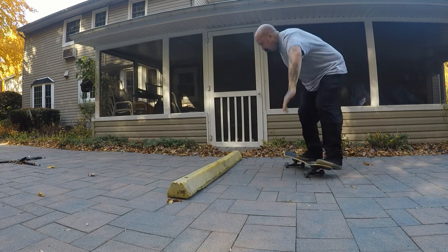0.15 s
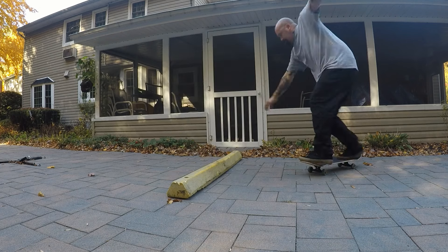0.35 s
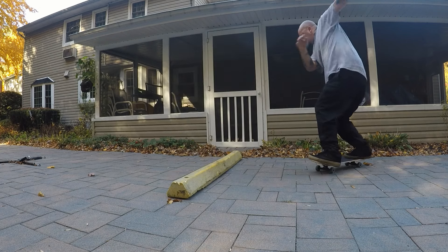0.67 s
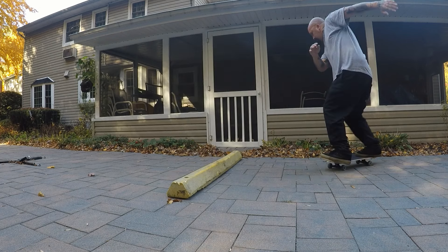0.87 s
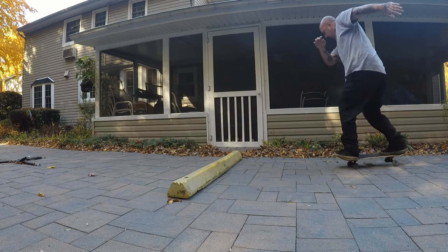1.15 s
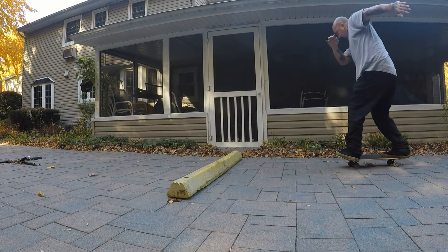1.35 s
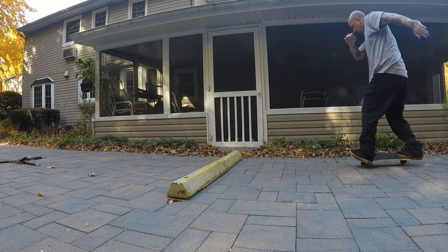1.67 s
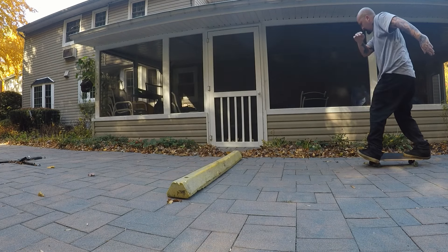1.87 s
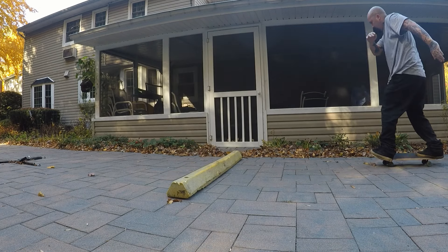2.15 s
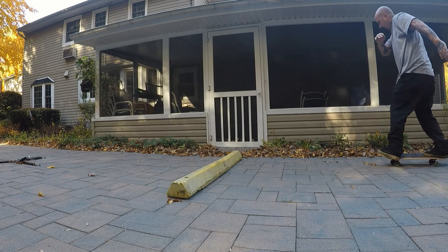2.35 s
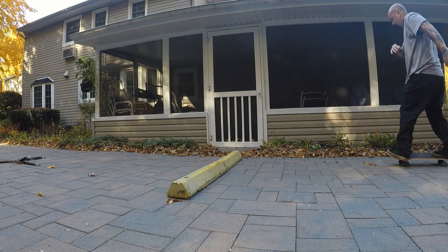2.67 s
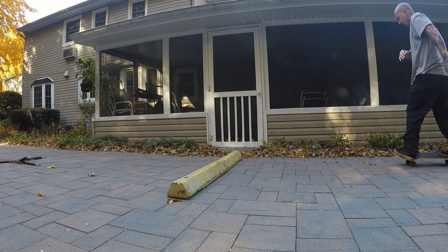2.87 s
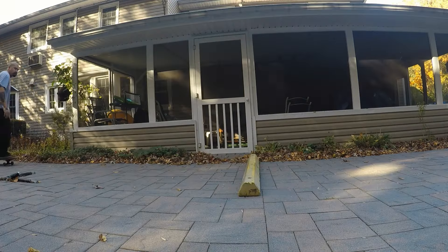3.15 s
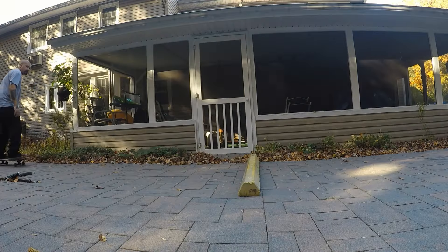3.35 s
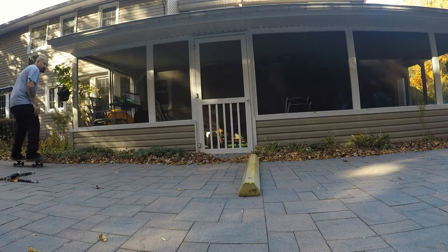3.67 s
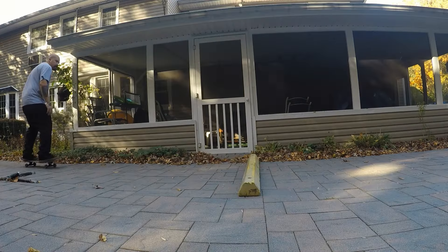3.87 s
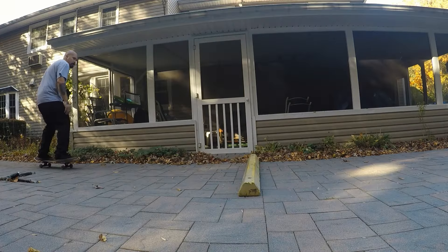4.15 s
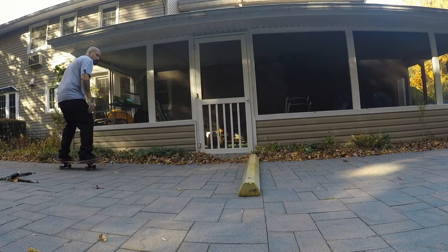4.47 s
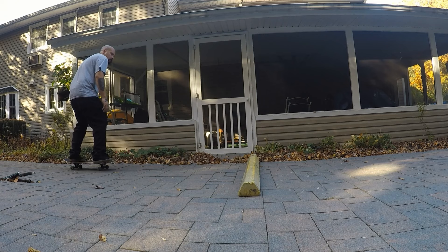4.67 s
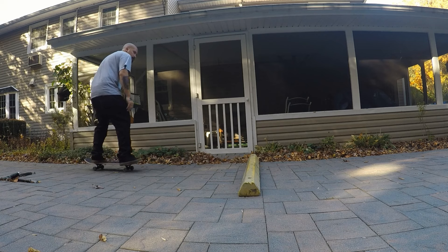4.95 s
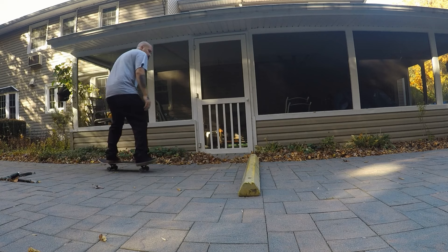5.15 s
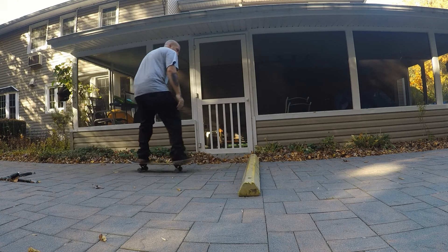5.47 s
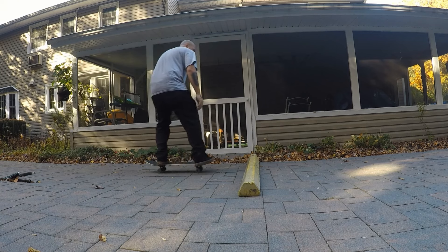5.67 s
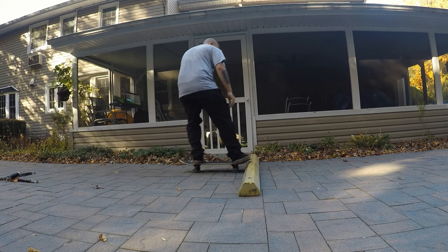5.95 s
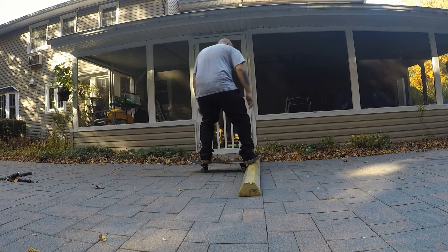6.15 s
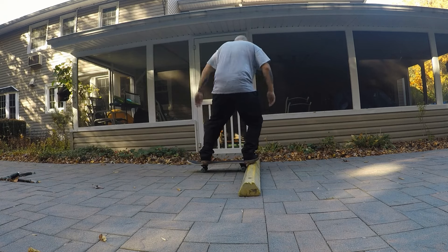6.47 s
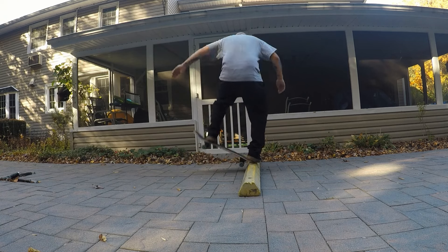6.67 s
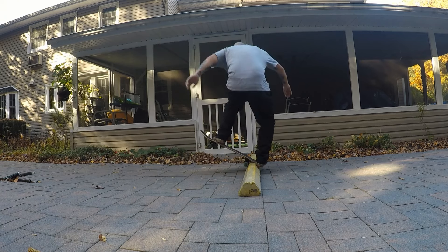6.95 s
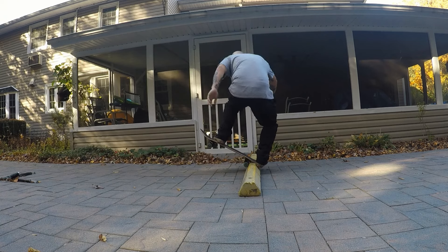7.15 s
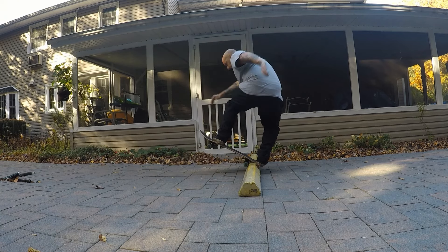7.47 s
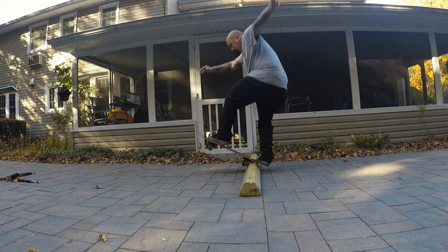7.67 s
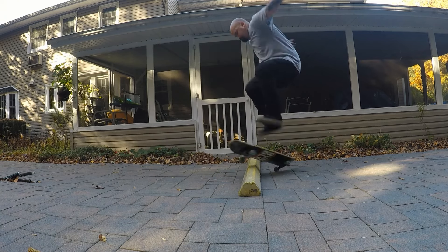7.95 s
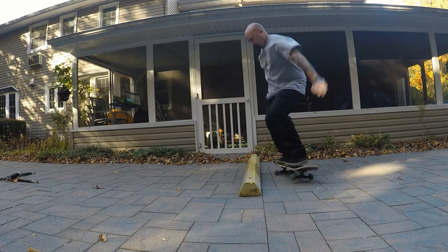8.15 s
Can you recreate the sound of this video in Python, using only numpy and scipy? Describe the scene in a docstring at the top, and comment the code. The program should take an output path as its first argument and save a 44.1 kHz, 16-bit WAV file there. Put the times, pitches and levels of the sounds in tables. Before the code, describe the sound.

A skateboard lands with woody thuds and cracks on patio pavers, then rolls off right, its rumble fading among sparse joint knocks, scuffs and tiny squeaks. A dry click opens a second, louder roll from the left, with dense bassy bumps over a distant motor hum. The board knocks onto a hollow-sounding parking block, pauses, pops with a metallic crack and lands hard. Close low stereo microphone, short house echo.

```python
"""Skateboard on a brick patio

Close on the pavers, from a camera with two microphone ports, beside a house that returns a short echo.
The rider lands and rolls off right, rolls in from the left, stalls on a parking block and pops off it.
Tail pops, landings and joints are swelling sine thuds through the ground; cracks, wheel scrub and
squeaks are filtered noise, ringing modes and wandering tones through the air.
A click opens the second ride; a distant motor hums through it, over outdoor rumble, wash and hiss."""
import sys
import numpy as np
from scipy import signal
from scipy.fft import rfft, irfft, next_fast_len
from scipy.io import wavfile
from scipy.ndimage import uniform_filter1d, minimum_filter1d, map_coordinates

SR = 44100
rng = np.random.default_rng(int(sys.argv[2]) if len(sys.argv) > 2 else 0)


def write(x):
    x = np.atleast_2d(x).T
    wavfile.write(sys.argv[1], SR, np.round(np.clip(x, -1, 1) * 32767).astype(np.int16))

N = 366030
T = np.arange(N) / SR

# Levels in the tables are relative; some sources trim them further.
# deck and trucks strike paving or block: start_s, crack_db, thud_db, thud_hz, thud_swell_s,
# truck_ring_db, rattle_db
BLOWS = [(0.012, -20, -12, 272, 0.0066, -49.5, -43), (0.057, -27, -22, 190, 0.014, -49, -49),
         (0.1163, -21, -5, 237, 0.0054, -39, -46.5), (0.4343, -20.5, -4, 273, 0.007, -26, -34.5),
         (0.439, -19.5, -9.5, 249, 0.011, -23.5, -40), (1.2888, -14.5, -5, 238, 0.0078, -34, -40),
         (6.111, -25.5, -6.5, 141, 0.0024, -35, -41.5), (6.145, -24, -5, 218, 0.0039, -52, -48),
         (6.8641, -16, -5, 278, 0.0026, -45, -32), (6.943, -46, -5.5, 189.6, 0.005, -48, -53),
         (7.843, -23, -6.5, 168, 0.0043, -25, -38.5), (7.8504, -26.5, -8, 308.4, 0.014, -24, -52),
         (7.9095, -23, -5, 179.5, 0.007, -50, -30), (7.93, -13.5, 4.5, 281, 0.0089, -5.5, -36),
         (8.0272, -14.5, 1, 278, 0.0075, -30, -40), (8.135, -22, -5.5, 253, 0.0073, -40, -37),
         (8.153, -19.5, 6.5, 286, 0.0078, -42, -35)]
# modes of the trucks and deck, each retuned a little per blow: pitch_hz, level_db, decay_s
TRUCK_MODES = [(1430, -15, .004), (1885, -11, .004), (2850, -3, .0015), (3170, 2, .0014), (3660, 8, .0017),
               (4200, -4, .0015)]
# the maple deck and its bolted hardware, around these values: pitch_hz, level_db, decay_s
WOOD_MODES = [(301.6, -0.5, 0.04), (343, 2.5, 0.01), (456.5, -5.5, 0.014), (522.6, -7, 0.012),
              (611, -13.5, 0.012), (747, -19.5, 0.011), (1235, -21.5, 0.017), (1444, -22, 0.0067),
              (1765, -25, .011), (1830, -23.5, 0.013), (2230, -25.5, 0.013)]
# the deck shuddering after a blow: frequency_hz, density_db (dB per Hz)
DECK_SPECTRUM = [(30, -49.5), (80, -5.5), (140, 4), (220, 1.5), (300, 2.5), (380, -9), (470, -15.5),
                 (650, -32), (950, -39), (2000, -48.5), (4000, -100)]
# cracks in the air: frequency_hz, density_db (dB per Hz)
CRACK_SPECTRUM = [(300, -0.5), (600, 1), (950, -11), (1400, 2.5), (1900, -9), (2500, -8), (3600, -10),
                  (4800, -13), (6200, -7), (9000, -18.5), (15000, -30.5)]
# wheels slap down or drop into the deeper paver joints; the first row is a blow's dying thud:
# start_s, thud_db, thud_hz, knock_db
JOINTS = [(0.001, -13, 292, -32), (0.161, -19.5, 307, -40), (0.381, -7, 263, -32), (0.391, -14.5, 308, -35),
          (0.889, -9, 241, -43), (1.107, -7.5, 260, -29.5), (1.284, -7, 248, -20), (1.363, -12, 237, -44.5),
          (1.676, -13.5, 269, -35), (1.773, -9, 194, -42.5), (2.013, -7, 147.5, -49), (2.064, -7, 168, -34),
          (2.287, -21, 243, -39.5), (2.665, -11, 210, -45), (3.129, -13, 186, -34), (3.177, -6, 170, -32.5),
          (3.204, -10.5, 251, -32), (3.298, -7, 191, -28.5), (3.326, -8, 193, -29.5),
          (3.365, -5.5, 182, -24), (3.425, -7, 220, -35), (3.531, -5.5, 138, -32), (3.553, -6, 171, -28),
          (3.616, -3.5, 176, -24.5), (3.706, -6.5, 161, -35), (3.73, -5, 260, -33), (3.766, -6.5, 188, -45),
          (3.818, -5.5, 305, -37), (3.883, -11, 375, -31.5), (3.989, -4.5, 265, -26.5),
          (4.06, -4, 184, -32), (4.153, -6.5, 177, -30.5), (4.178, -6, 254, -32), (4.314, -14, 206, -36),
          (4.348, -11, 300, -27), (4.382, -5.5, 255, -33), (4.473, -8.5, 239, -32.5), (4.533, -4, 204, -32),
          (4.561, -6.5, 279, -28.5), (4.681, -10.5, 195, -35.5), (4.768, -8.5, 202, -33.5),
          (4.864, -15, 230, -28.5), (4.888, -3, 290, -26.5), (4.947, -3.5, 173.5, -24.5),
          (4.997, -9.5, 201, -30.5), (5.067, -4.5, 181, -34), (5.178, -17.5, 200, -32),
          (5.258, -5, 223, -26), (5.277, -5, 321, -22), (5.432, -13.5, 308, -28), (5.455, -5.5, 256, -30),
          (5.52, -13.5, 210, -31.5), (5.626, -1.5, 172, -22.5), (5.736, 0, 187, -24.5),
          (5.808, -7, 239, -36), (5.92, -4.5, 210, -28), (5.972, -2.5, 148, -27), (5.998, -8, 211, -26),
          (6.048, -6.5, 158, -24.5), (6.18, -12, 256, -30.5), (6.9, -4, 262, -27), (8.279, -7, 218, -35)]
# a wheel clacking on a paver edge: frequency_hz, density_db (dB per Hz)
CLACK_SPECTRUM = [(300, -4), (520, 4), (720, -9.5), (930, -9.5), (1500, -20), (7000, -33.5)]
# stretches on the wheels; a negative fade grows: start_s, stop_s, rumble_db, hiss_db, fade_db_per_s
ROLLS = [(0.44, 0.807, -31, -56, 9.5), (0.857, 3.14, -24.5, -55, 1.5), (3.118, 6.173, -16.5, -59.5, -1.2),
         (8.16, 8.302, -32, -64, 3)]
# paving shaken by the wheels: frequency_hz, density_db (dB per Hz)
GROUND_SPECTRUM = [(24, -26.5), (40, -29), (98, -2.5), (130, -3), (166, -5), (310, -8.5), (377, -12.5),
                   (433, -22.5), (527, -25.5), (770, -46.5), (1500, -54), (3300, -120)]
# wheels and trucks scuff sideways: middle_s, nominal length_s, level_db
SCUFFS = [(0.106, 0.1, -52), (0.338, 0.055, -51), (0.617, 0.058, -53), (0.729, 0.091, -48.5),
          (1.07, 0.17, -54.5), (1.284, 0.024, -44), (1.407, 0.1, -43), (1.589, 0.092, -46),
          (1.729, 0.13, -40.5), (2.37, 0.11, -50), (2.964, 0.041, -49.5), (3.573, 0.05, -51),
          (3.974, 0.1, -52.5), (4.193, 0.12, -51.5), (4.598, 0.17, -54.5), (4.987, 0.26, -57.5),
          (5.517, 0.16, -45.5), (5.797, 0.13, -43), (5.963, 0.11, -52), (6.079, 0.055, -46),
          (7.783, 0.22, -50), (8.284, 0.022, -44.5)]
# the rough notes a scuff sings, before they wander: pitch_hz, level_db against the scuff
SCUFF_NOTES = [(3000, -12), (3720, -4), (4550, -11)]
# wheels scrubbing on gritty brick: frequency_hz, density_db (dB per Hz)
GRIT_SPECTRUM = [(500, -33), (1000, -21.5), (1450, -9.5), (1820, -10), (2100, -13.5), (2750, -9.5),
                 (3060, -7.5), (3380, -6.5), (3700, -1.5), (4080, -5.5), (5200, -8), (6700, -5.5),
                 (8200, -12), (13000, -24.5), (15500, -40)]
# wheels squeak as the board pivots, around this pitch: start_s, length_s, pitch_hz, level_db
SQUEAKS = [(.085, .035, 3200, -40), (.09, .028, 4400, -40), (.315, .045, 3450, -43), (.592, .04, 3250, -44),
           (1.725, .028, 3100, -36), (6.398, .045, 3950, -43), (6.582, .02, 4000, -50)]
# the board judders on brick or block, or its deck rings roughly in the air after the pop:
# middle_s, length_s, level_db
JUDDERS = [(5.785, 0.13, -29), (6.12, 0.09, -26), (6.888, 0.04, -28), (6.96, 0.06, -24),
           (7.02, 0.13, -34.5), (7.82, 0.11, -26.5), (7.99, 0.08, -28.5), (8.067, 0.04, -28)]
# rough concrete shaking the deck: frequency_hz, density_db (dB per Hz)
CONCRETE_SPECTRUM = [(100, -12), (310, 10), (480, 4), (750, -24), (1800, -45), (7000, -68)]
# the board comes down on the parking block: start_s, ring_db, weight_db
BLOCK_HITS = [(6.112, -15, -22), (6.146, -24, -10.5), (6.863, -16.5, -8)]
# the clack of the block: pitch_hz, level_db against its hollow note, decay_s
BLOCK_MODES = [(1350, -26, .012), (1740, -20, .013), (2100, -24.5, .01)]
# the distant motor, before its speed wanders: time_s, pitch_hz, level_db
MOTOR = [(3.147, 138.3, -22.5), (4.099, 135.5, -22.5), (5, 134.6, -19.5), (6, 136.5, -22),
         (6.6, 139.5, -27.5), (7.4, 139.2, -22.5), (8.3, 136.7, -30.5)]
# the motor's tones: pitch_ratio (to the motor pitch), level_db
MOTOR_TONES = [(.468, -11), (1, 0.5), (1.794, -18.5), (2, -22)]
# the deep outdoor rumble: time_s, level_db
DEEP_RUMBLE = [(0, -40), (1.5, -28.5), (3, -44.5), (3.15, -27.5), (7.8, -25), (8.3, -24.5)]
# the far wash of the yard: frequency_hz, density_db (dB per Hz)
YARD_SPECTRUM = [(100, -13.5), (250, 15.5), (600, 2), (1000, -6), (2000, -7.5), (4500, -15.5),
                 (9500, -14.5), (14000, -25)]
# where the board is: time_s, bearing (-1 left to 1 right)
BEARING = [(0, 0.31), (1.3, 0.62), (3.1, 0.71), (3.15, -0.64), (4.5, -0.6), (5.5, -0.61), (6.2, 0.65),
           (7.8, 0.37), (8.3, 0.81)]
# how ground vibration drives the two ports against each other: frequency_hz, side_minus_mid_db
PORT_ROCKING = [(60, -13.5), (130, -20.5), (300, -20), (430, -13.5), (650, 4.5), (900, 18.5), (1500, 13.5)]

CRACK_LENGTH_S = 0.003  # fall time of every crack's bell-shaped burst
STRIKE_SPREAD_DB = 3  # spread of the wood modes from strike to strike
BUMPS_DB, SHUDDER_DB, DRAG_RING_DB = -5.5, -14.5, -10  # brick faces, after a joint, wood in a judder
# shallow joints: rate, thud level over the rumble and its spread
SHALLOW_PER_S, SHALLOW_DB, SHALLOW_SCATTER_DB = 6, -4, 1.5
SHALLOW_HZ, SHALLOW_KNOCK_DB = 229, -29.5  # usual pitch; knock level against the thud
ROLL_ATTACK_S, ROLL_RELEASE_S = 0.03, 0.084
HISS_PATCH_DB, HISS_PATCHES_PER_S = 1.8, 22  # gritty and smooth bricks under the wheels
CATCH_DB, CATCHES_PER_S = 2.5, 90  # a sliding wheel grips and lets go
# each scuff note wanders in pitch (fraction) and swells on its own
SING_WANDER, SING_SWELL_DB, SING_SWELLS_PER_S = .035, 4, 18
CLICK_S, CLICK_DB, CLICK_DECAY_S = 3.1433, -9.5, 0.0032
AIR_HISS_DB = -67
TOP_HZ = 15400


def undb(db):
    """Decibels to gain."""
    return 10 ** (np.asarray(db) / 20)


def curve(rows):
    """Join (time_s, value) rows by straight lines."""
    return np.interp(T, *np.transpose(rows))


def unit(x):
    """Scale to rms 1."""
    return x / np.sqrt(np.mean(x ** 2))


def noise():
    """White noise, rms near 1."""
    return rng.standard_normal(N)


def walk(rate):
    """Smooth chance, spread near 1, with about `rate` turns a second."""
    hold = max(int(SR / rate), 1)
    steps = np.repeat(rng.standard_normal(N // hold + 1), hold)
    return 1.272 * uniform_filter1d(steps, hold)[:N]


def gains(points, hz):
    """Read a (frequency_hz, level_db) spectrum on a log-frequency axis."""
    f, db = np.transpose(points)
    return undb(np.interp(np.log(hz + 1), np.log(f), db))


def colour(x, points, size=4096):
    """Causal, minimum-phase filter of unit energy with the given spectrum."""
    cepstrum = irfft(np.log(gains(points, np.fft.rfftfreq(size, 1 / SR))))
    cepstrum[1:size // 2] *= 2  # fold the cepstrum onto positive time
    cepstrum[size // 2 + 1:] = 0
    response = irfft(np.exp(rfft(cepstrum)))
    return signal.oaconvolve(x, response / np.linalg.norm(response))[:N]


def add(track, s, sound):
    """Mix a sound into a track at time s."""
    i = max(int(s * SR), 0)
    track[i:i + len(sound)] += sound[:N - i]


def grains(rate, spread_db):
    """Random tiny impacts, a few much larger than the rest, together rms 1."""
    hits = rng.random(N) < rate / SR
    sizes = undb(spread_db * np.minimum(rng.exponential(size=N), 3))
    return unit(hits * noise() * sizes)


def thud(hz, swell_s, size=5000):
    """The loaded board bounces on its wheels: a few cycles that swell and die."""
    t = T[:size]
    swell = (t / swell_s * np.exp(1 - t / swell_s)) ** 2
    return -swell * np.sin(2 * np.pi * hz * t)


def mode(hz, decay_s, size=8000):
    """A struck resonance: a sine that decays exponentially."""
    return np.exp(-T[:size] / decay_s) * np.sin(2 * np.pi * hz * T[:size])


def ringing(kicks, decay_s, size=20000):
    """Envelope of the vibration that lingers after each kick, summed as energy."""
    energy = signal.oaconvolve(kicks ** 2, np.exp(-2 * T[:size] / decay_s))[:N]
    return np.sqrt(np.abs(energy))


def wood(size=5000):
    """The deck's ring; where it is struck decides which modes speak, so each strike is drawn anew."""
    ring = np.zeros(size)
    for hz, db, decay_s in WOOD_MODES:
        level = undb(db + STRIKE_SPREAD_DB * rng.normal())
        ring += level * mode(hz * (1 + 0.018 * rng.normal()), decay_s, size=size)
    return ring


def through_deck(x):
    """Small knocks ring the deck's modes."""
    ring = wood()
    return signal.oaconvolve(x, ring / np.linalg.norm(ring))[:N]


def blows(thud_db=0.5, crack_db=-3.0, ring_db=0, knock_db=-11, knock_hz=470, knock_s=0.0034,
          shake_db=-12.5, shake_s=0.062, rattle_s=0.04, rebound_db=5, rebounds_per_s=260,
          bite_s=0.0012, size=5000):
    """Blows thud, crack and ring trucks and deck; loose hardware rattles and rebounds: (ground, air)."""
    ground, clatter, metal, body, heavy, loose = np.zeros((6, N))
    bite = 1 - np.exp(-T[:size] / bite_s)  # contact builds up as grit crushes
    burst = bite * np.exp(-(T[:size] / CRACK_LENGTH_S) ** 2)
    for s, crack, weight, hz, swell_s, ring, rattle in BLOWS:
        knock = undb(knock_db) * thud(knock_hz, knock_s)
        add(ground, s, undb(weight + thud_db) * (thud(hz, swell_s) + knock))
        add(clatter, s, undb(crack + crack_db) * burst)
        tones = sum(undb(db) * mode(f * (1 + 0.023 * rng.normal()), decay_s, size=size)
                    for f, db, decay_s in TRUCK_MODES)
        add(metal, s, undb(ring + ring_db) * bite * tones)
        add(body, s, undb(crack) * bite * wood(size=size))
        add(heavy, s, undb([weight]))
        add(loose, s, undb([rattle]))
    ground += undb(shake_db) * colour(noise() * ringing(heavy, shake_s), DECK_SPECTRUM)
    rattling = ringing(loose, rattle_s)
    rebounds = rattling * grains(rebounds_per_s, 0.87)
    body += undb(rebound_db) * through_deck(rebounds)
    fine_cracks = (clatter + 0.95 * rattling) * grains(22000, .5)
    return ground, metal + body + colour(fine_cracks + 0.5 * rebounds, CRACK_SPECTRUM)


def joints(thud_db=0.8, swell_s=0.0037, knock_db=5, knock_hz=480, knock_s=0.0032, flex_hz=94,
           flex_db=-25, far_db=21, flex_s=0.032, shake_s=0.068, clack_db=-10.5, clack_s=0.015):
    """Each row gives a knock, bounce, deck flex, short shudder and hollow clack: (ground, air)."""
    ground, kicks, edges = np.zeros((3, N))
    rows = np.vstack([JOINTS, shallow_joints()])
    detune = np.exp(0.072 * rng.standard_normal((len(rows), 2)))
    for (s, db, hz, knock), (knock_tune, flex_tune) in zip(rows, detune):
        far = abs(np.interp(s, *np.transpose(BEARING)))  # further off, the bass takes a larger share
        add(ground, s, undb(db + thud_db) * thud(hz, swell_s))
        add(ground, s, undb(knock + knock_db) * thud(knock_hz * knock_tune, knock_s))
        add(ground, s, undb(db + flex_db + far_db * far) * thud(flex_hz * flex_tune, flex_s))
        add(kicks, s, undb([db]))
        add(edges, s, undb([knock]))
    shudder = undb(SHUDDER_DB) * noise() * ringing(kicks, shake_s)
    clacks = undb(clack_db) * grains(2500, 0.92) * ringing(edges, clack_s)
    return ground + colour(shudder, GROUND_SPECTRUM), colour(clacks, CLACK_SPECTRUM)


def shallow_joints(count=90):
    """Lesser joints pass at random, as strong as the rolling rumble. Returns rows like JOINTS."""
    rumble, _ = riding()
    place, strength, pitch = rng.standard_normal((count, 3)).T
    s = (np.arange(count) + place / 2) / SHALLOW_PER_S
    rumble_db = 20 * np.log10(np.interp(s, T, rumble) + 1e-9)
    db = rumble_db + SHALLOW_DB + SHALLOW_SCATTER_DB * strength
    rows = np.column_stack([s, db, SHALLOW_HZ * np.exp(0.22 * pitch), db + SHALLOW_KNOCK_DB])
    return rows[(s > 0) & (s < T[-1])]


def riding():
    """Each stretch starts quickly, fades or grows steadily and dies away: gains (rumble, hiss)."""
    rumble, hiss = np.zeros((2, N))
    for start, stop, rumble_db, hiss_db, fade in ROLLS:
        attack = np.clip((T - start) / ROLL_ATTACK_S, 0, 1)
        release = np.exp(-np.maximum(T - stop, 0) / ROLL_RELEASE_S)
        level = attack * release * undb(-fade * np.maximum(T - start, 0))
        rumble += undb(rumble_db) * level
        hiss += undb(hiss_db) * level
    return rumble, hiss


def rolling(patchy_db=3.0, patches_per_s=12, soft_hz=340):
    """Bumps of the brick faces, some rougher than others, shake the paving through the soft wheels."""
    rumble, _ = riding()
    bumps = grains(400, 1.1) * rumble * undb(BUMPS_DB + patchy_db * walk(patches_per_s))
    soft_wheels = signal.butter(N=2, Wn=soft_hz, fs=SR, output="sos")
    return signal.sosfilt(soft_wheels, colour(bumps, GROUND_SPECTRUM))


def scrub(db=-0.4, tread_db=0, chatter_db=2.0, sand_db=-8):
    """Wheels hiss and crush sand; pushed sideways they catch and slip, singing at a wandering pitch."""
    slide = np.zeros(N)
    for s, length, scuff_db in SCUFFS:
        window = signal.windows.tukey(int(length * SR * 3 / 2), .8)  # its soft ends reach past the length
        add(slide, s - length * 3 / 4, undb(scuff_db + db) * window)
    slide *= undb(CATCH_DB * walk(CATCHES_PER_S))
    slips = grains(16000, .6) * undb(chatter_db * walk(220))
    _, hiss = riding()
    tread = hiss * undb(tread_db + HISS_PATCH_DB * walk(HISS_PATCHES_PER_S))
    rub = np.hypot(slide, tread)
    sand = grains(160, 2.2) * rub * undb(sand_db)
    sing = np.zeros(N)
    for hz, note_db in SCUFF_NOTES:
        turns = np.cumsum(hz * (1 + SING_WANDER * walk(CATCHES_PER_S))) / SR
        swell = undb(note_db + SING_SWELL_DB * walk(SING_SWELLS_PER_S))
        sing += swell * slide * walk(220) * np.sin(2 * np.pi * turns)  # the fast walk roughens the note
    return colour(slips * rub + sand, GRIT_SPECTRUM) + sing + colour(noise() * tread / 2, CRACK_SPECTRUM)


def squeaks(arch=0.056, octave_db=-7):
    """Stick-slip locks briefly into a rough pitch that rises and falls."""
    out = np.zeros(N)
    waver = .065 * walk(1800)
    for s, length, hz, db in SQUEAKS:
        grip = np.sin(np.linspace(0, np.pi, int(length * SR)))
        pitch = hz * (1 + arch * (grip - 2 / np.pi) + waver[int(s * SR):][:len(grip)])
        phase = 2 * np.pi * np.cumsum(pitch) / SR
        add(out, s, undb(db) * grip * (np.sin(phase) + undb(octave_db) * np.sin(2 * phase)))
    return out


def judder(scrape_db=-24):
    """Short trains of tiny impacts swell and fade, shaking the deck, ringing wood, scraping: (ground, air)."""
    strength = np.zeros(N)
    for s, length, db in JUDDERS:
        swell = np.sin(np.linspace(0, np.pi, int(length * SR)))
        add(strength, s - length / 2, undb(db) * swell)
    impacts = grains(1100, 0.74) * strength
    ring = undb(DRAG_RING_DB) * through_deck(impacts)
    scrape = undb(scrape_db) * colour(impacts, CRACK_SPECTRUM)
    return colour(impacts, CONCRETE_SPECTRUM), ring + scrape


def block_hits(sink_hz=78, sink_s=0.011, hollow_hz=458, hollow_s=0.028):
    """Weight sinks onto the parking block, which rings a hollow note and a bright clack: (ground, air)."""
    ground, air = np.zeros((2, N))
    for s, ring, weight in BLOCK_HITS:
        add(ground, s, undb(weight) * thud(sink_hz, sink_s))
        add(ground, s, undb(ring) * mode(hollow_hz, hollow_s))
        add(air, s, sum(undb(ring + db) * mode(hz, decay_s) for hz, db, decay_s in BLOCK_MODES))
    return ground, air


def click(size=600):
    """One dry click, a decaying pulse, opens the second ride."""
    out = np.zeros(N)
    add(out, CLICK_S, undb(CLICK_DB) * np.exp(-T[:size] / CLICK_DECAY_S))
    return out


def motor(waver=0.0065, throb_db=1):
    """A far motor drones through the second ride, its speed wandering and each tone throbbing slightly."""
    s, *columns = np.transpose(MOTOR)
    hz, level_db = (np.interp(T, s, column) for column in columns)
    turns = np.cumsum(hz * (1 + waver * walk(14))) / SR
    drone = np.zeros(N)
    for ratio, db in MOTOR_TONES:
        drone += undb(level_db + db + throb_db * walk(11)) * np.sin(2 * np.pi * ratio * turns)
    return np.sqrt(2) * drone * (T > CLICK_S)


def yard(air_db=-50, deep_db=0):
    """Outdoor air: a low rumble and far wash common to both ports, and a faint hiss in each."""
    # both spectra: frequency_hz, density_db
    deep = [(10, -36.0), (22, -6.5), (35, -9.5), (55, -5.5), (90, -7.0), (200, -23.0), (600, -77)]
    fine = [(200, -18), (700, -6), (1500, 3.5), (4000, -6.0), (10000, -5), (14000, -25)]
    rumble = colour(noise(), deep) * undb(curve(DEEP_RUMBLE) + deep_db)
    wash = undb(air_db + walk(1.8)) * colour(noise(), YARD_SPECTRUM)
    hiss = np.array([colour(noise(), fine) for _ in range(2)])
    return rumble + wash + undb(AIR_HISS_DB) * hiss


def through_ground(x, turn=-1.26, bass_turn=-1.45, own_db=-24):
    """Ground vibration reaches both ports alike in the bass and rocks the camera higher up."""
    size = next_fast_len(N)
    hz = np.fft.rfftfreq(size, 1 / SR)
    angle = np.interp(hz, [350, 600], [bass_turn, turn / 2])  # phase of the rocking, radians
    side = irfft(rfft(x, size) * gains(PORT_ROCKING, hz) * np.exp(1j * angle), size)[:N]
    side += undb(own_db) * np.interp(T - .011, T, x)  # a later wave through the paving, from the side
    return np.array([x + side, x - side])


def through_air(x, port_lag_s=.00006, shade_db=2.0, echo_db=-10, echo_decay_s=0.067,
                treble_decay_s=0.018, treble_db=2, split_hz=2600, wall_s=0.00045, size=16000):
    """The far port hears later and softer; the house front scatters an echo whose treble dies first."""
    bearing = curve(BEARING)
    direct = []
    for ear in (-1, 1):  # left, right
        arrival = (T + ear * bearing * port_lag_s / 2) * SR
        direct.append(map_coordinates(x, [arrival], order=3) * undb(ear * bearing * shade_db))
    t = T[:size]
    scatter = rng.standard_normal((2, size))
    low = signal.butter(N=6, Wn=split_hz, fs=SR, output="sos")
    high = signal.butter(N=6, Wn=split_hz, btype="high", fs=SR, output="sos")
    dull = signal.sosfilt(low, scatter) * np.exp(-t / echo_decay_s)
    bright = signal.sosfilt(high, scatter) * np.exp(-t / treble_decay_s)
    tails = (dull - undb(treble_db) * bright) * np.minimum(t / wall_s, 1)
    echo = [signal.oaconvolve(x, tail / np.linalg.norm(tail))[:N] for tail in tails]
    return np.array(direct) + undb(echo_db) * np.array(echo)


def scene():
    """Thuds, rumble and motor arrive by the paving, the board's bright sounds by the air."""
    blow_thuds, cracks = blows()
    joint_thuds, ticks = joints()
    shaking, scrape = judder()
    block_thuds, clacks = block_hits()
    ground = through_ground(blow_thuds + joint_thuds + block_thuds + rolling() + shaking + motor())
    air = through_air(cracks + clacks + ticks + scrape + scrub() + squeaks())
    return ground + air + click() + yard()


def record(dry, recover_db_per_s=40):
    """A limiter ducks both ports on the loudest peaks and recovers steadily; the top is cut."""
    over_db = np.maximum(20 * np.log10(np.abs(dry).max(axis=0) / .95 + 1e-9), 0)
    duck_db = np.maximum.accumulate(over_db + recover_db_per_s * T) - recover_db_per_s * T
    gain = uniform_filter1d(minimum_filter1d(undb(-duck_db), size=60), size=60)
    top_cut = signal.ellip(8, .2, 70, TOP_HZ, fs=SR, output="sos")
    return signal.sosfilt(top_cut, dry * gain)


dry = scene()
out = record(dry)
write(out)
```